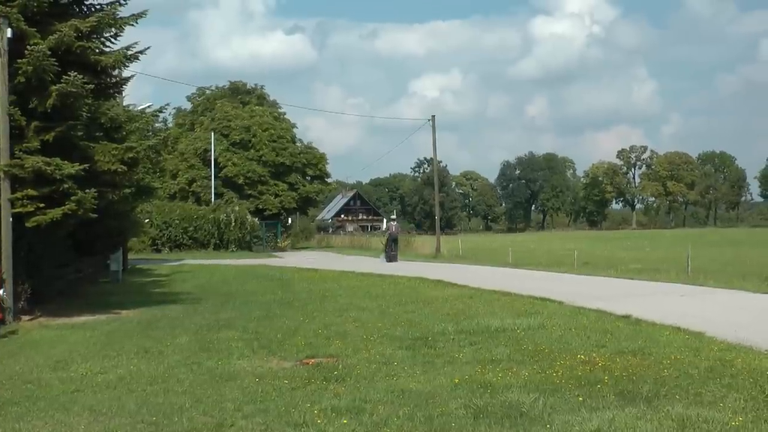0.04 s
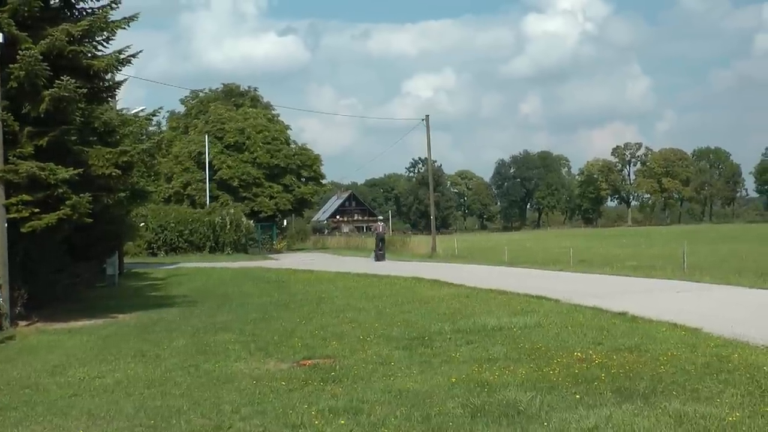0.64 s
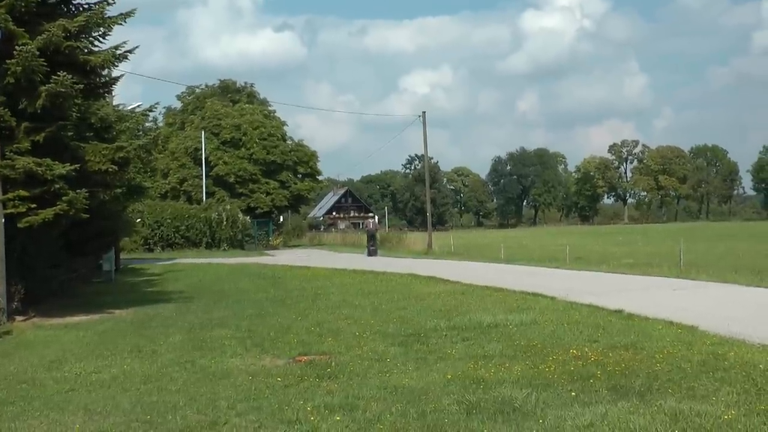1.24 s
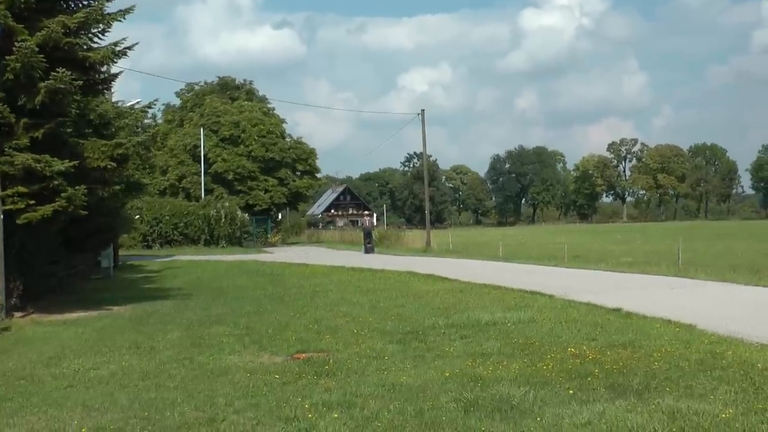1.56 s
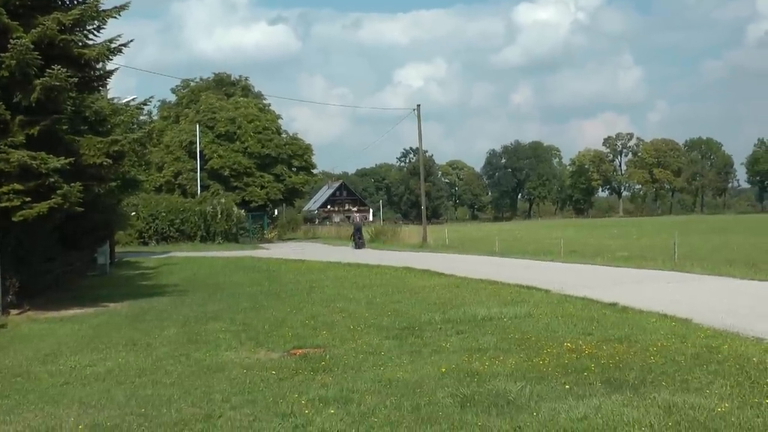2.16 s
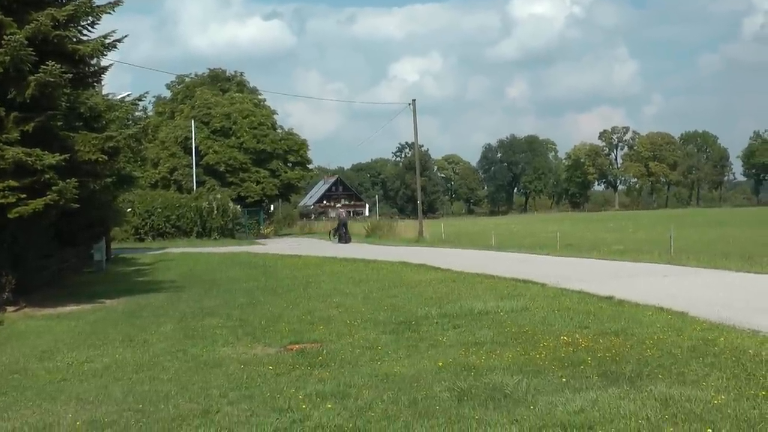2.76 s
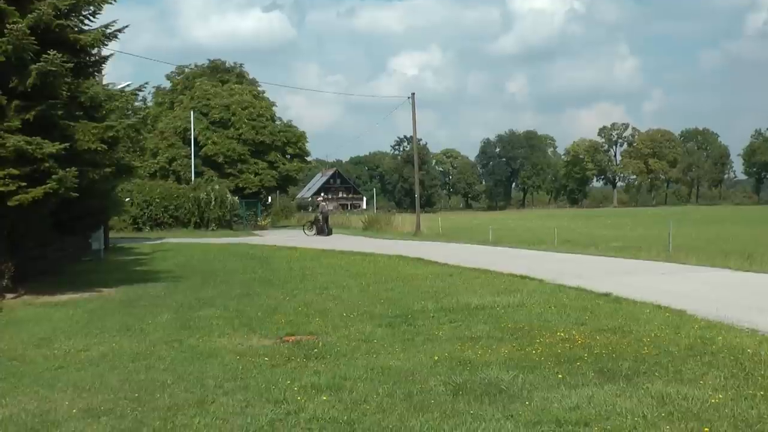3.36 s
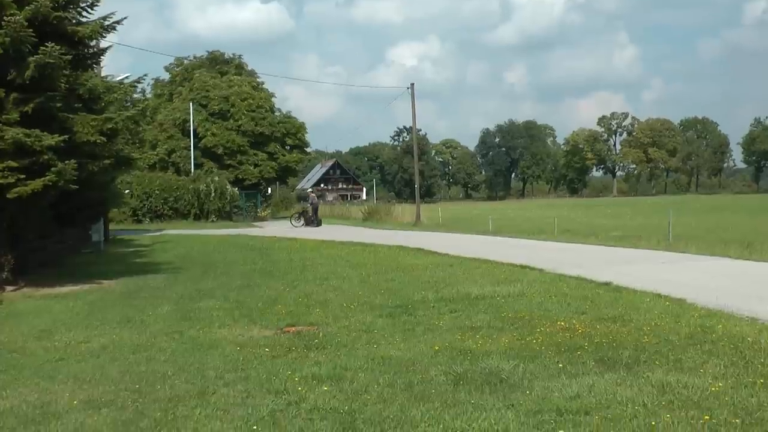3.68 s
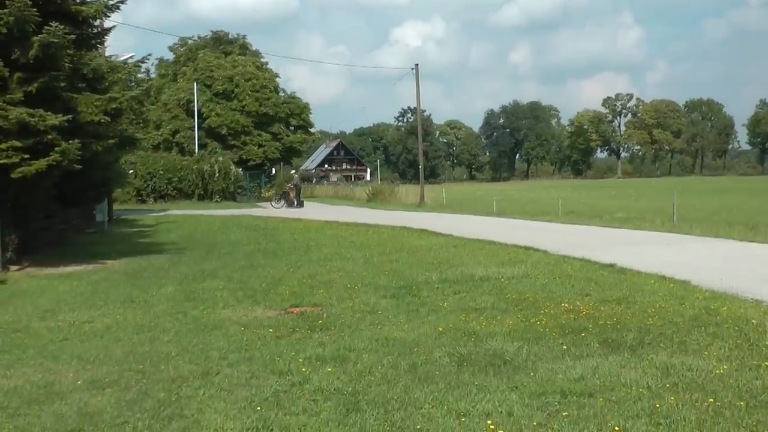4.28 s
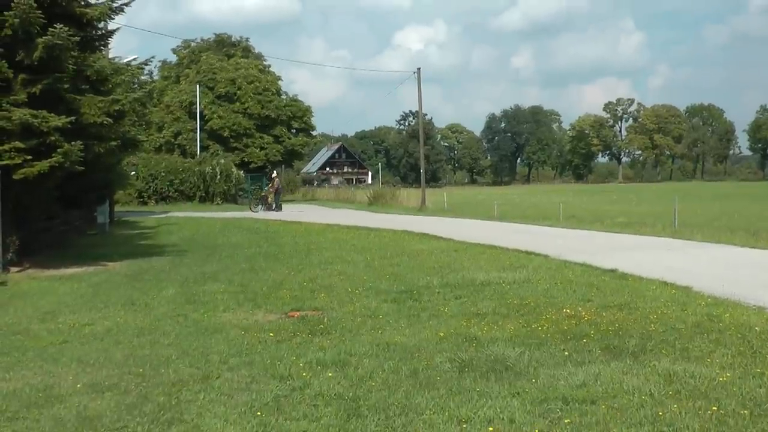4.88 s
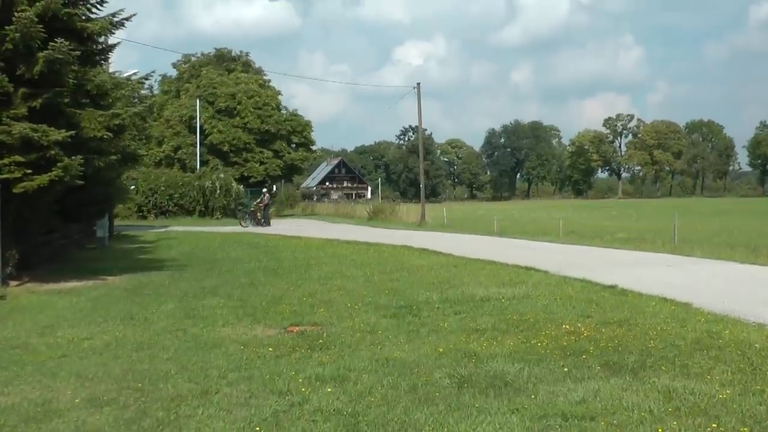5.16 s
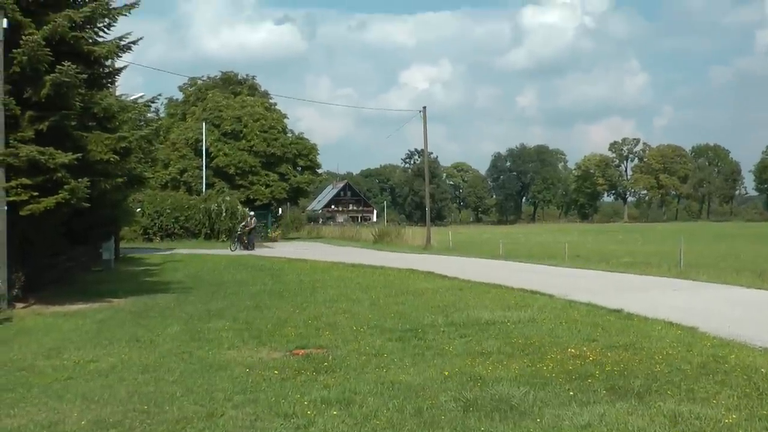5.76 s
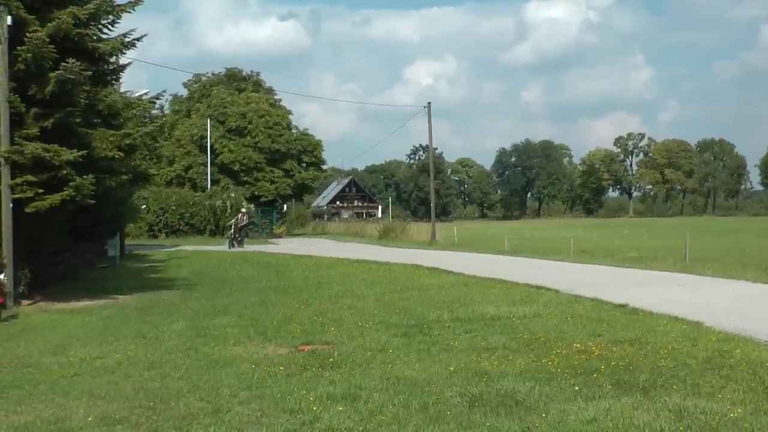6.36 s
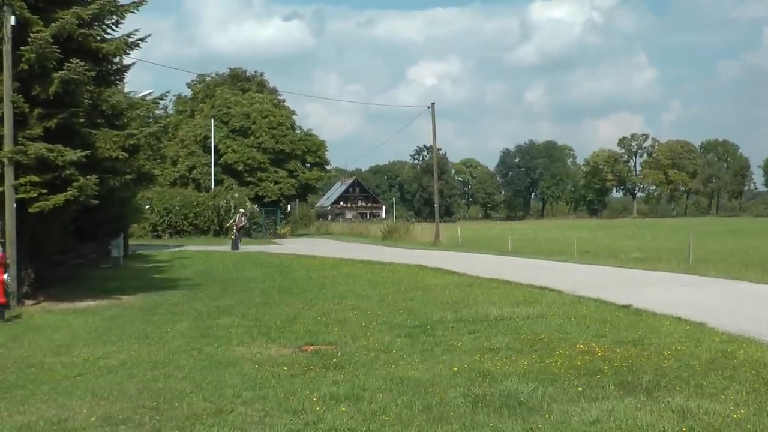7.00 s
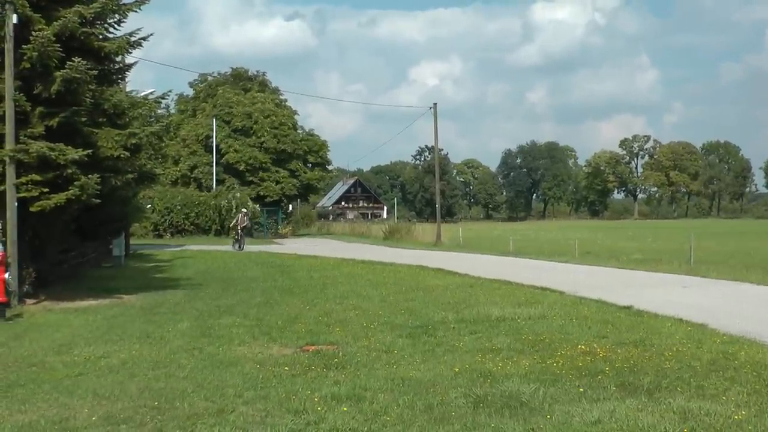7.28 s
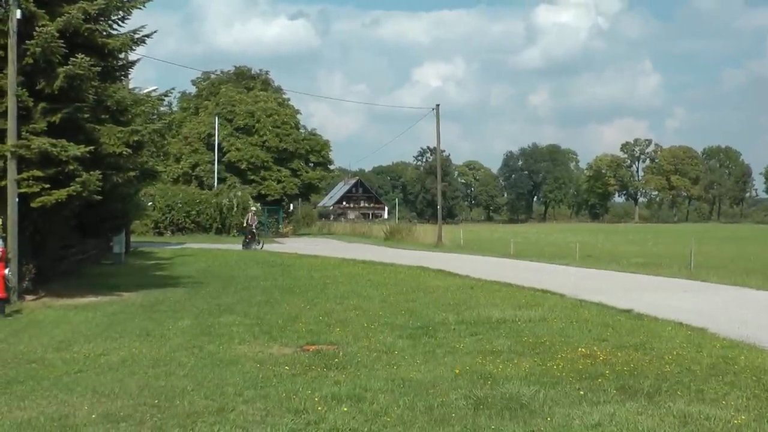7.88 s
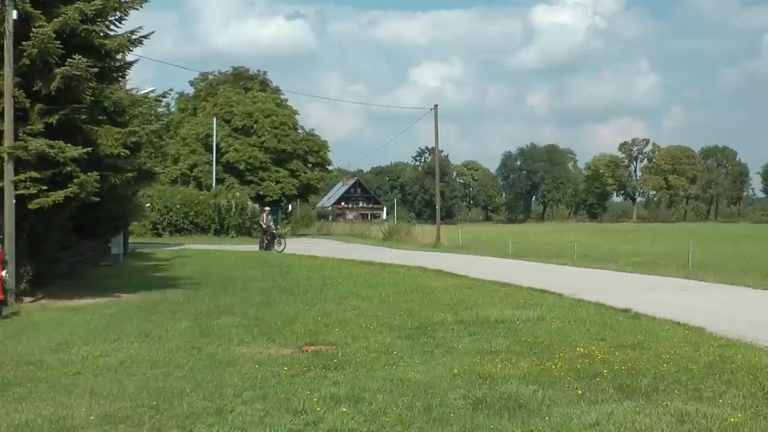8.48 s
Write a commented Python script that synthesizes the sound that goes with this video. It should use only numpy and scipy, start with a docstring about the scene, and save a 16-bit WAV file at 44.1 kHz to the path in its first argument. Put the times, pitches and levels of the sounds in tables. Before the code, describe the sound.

A small steam cycle chuffs rapidly along a country lane, growing louder over a soft breeze, with two distant bangs and faint birds.

```python
"""A small steam cycle chuffs along a country lane from the start, over breeze, far traffic and a low hum.
Two cylinders blow in turn, 17-27 blasts/s, louder on the facing side; steam leaks, trees scatter blasts.
A far bird cries at 0.6 s. Two distant bangs echo at 1.3 and 2.0 s; small birds chirp from 1.9 s.
Soft knocks follow from 2.7 s and a low drone swells near 3.7 s. The machine, turning towards the
listener, is slowest at 4.2 s, then picks up and is loudest near 7.7 s."""
import sys
import numpy as np
from scipy import signal
from scipy.fft import rfft, irfft
from scipy.io import wavfile
from scipy.ndimage import uniform_filter1d

SR = 44100
rng = np.random.default_rng(int(sys.argv[2]) if len(sys.argv) > 2 else 0)


def wrap_up_sound(samples):
    """Save the sound to the file named by the first command line argument, as 16-bit audio."""
    columns = np.atleast_2d(samples).T
    # keep every value between -1 and 1, then stretch to whole-number steps
    tamed = np.clip(columns, -1, 1)
    steps = np.round(tamed * 32767).astype(np.int16)
    wavfile.write(sys.argv[1], SR, steps)


N = 381024
TIME = np.arange(N) / SR

# crank, slowing into the bend and picking up after it: t/s, speed/(turns/s)
CRANK_SPEED = [(0.0, 6.8137), (0.891, 5.8162), (1.627, 5.1292), (2.358, 4.8702), (2.727, 4.6154),
               (3.14, 4.6491), (3.955, 4.2965), (4.172, 4.1688), (4.761, 4.2913), (5.277, 4.5227),
               (6.044, 4.5504), (6.411, 4.7401), (7.39, 5.0059), (7.565, 5.0194), (7.916, 5.4225),
               (8.64, 5.4655)]
# valve openings of two double-acting cylinders: crank angle/turns
VALVE_ANGLES = [.1335, .3987, .6563, .9155]
# four strokes: level offset/dB, nominal blow-down/turns, tilt offset/(dB/oct)
PISTON_STROKES = [(-.5, .097, 1.5), (-.5, .089, -2.1), (.5, .098, 1.5), (.5, 0.085, -0.8)]
# steam pressure and nearness together: t/s, relative level/dB
BLAST_LEVEL = [(0.0, -37), (1.51, -41), (2.36, -31.5), (2.69, -30.5), (2.89, -27), (3.34, -28), (3.53, -23),
               (4.26, -28), (4.85, -29), (5.17, -24.5), (5.75, -24.5), (6.03, -22), (6.87, -22),
               (7.66, -18), (7.85, -20), (8.11, -19.5), (8.31, -22), (8.64, -23)]
# machine swinging round: t/s, gain of first pipe and loss of second/dB
PIPE_FACING = [(0.0, 4.5), (1.3, 1), (2.5, 4), (3.1, 0.4), (4.2, -1.2), (4.7, 0.4), (5.7, 0), (6.6, -1.6),
               (7.4, -2.5), (7.9, -5.2), (8.6, -4)]
# treble coming and going across the field: t/s, tilt/(dB/oct)
BLAST_TILT = [(0.0, -2.2), (2.02, -5), (2.36, -1.8), (2.55, -4.5), (2.95, 2.2), (3.14, -4), (3.34, -3),
              (3.53, 2.5), (4.26, -5.5), (5.5, 2.1), (5.69, -2.65), (5.97, 0.5), (7.13, -0.6), (7.6, 1.0),
              (8.31, 0.2), (8.64, 3)]
# treble shelf, rising from 9 to 14 kHz: t/s, gain/dB
TOP_SHELF = [(0, -1), (3.6, 1.5), (4.3, -1), (5.4, 2), (6, -6), (6.6, 2), (7.1, 2.5), (7.6, -5), (8.64, 5)]
# steam jet: f/Hz, relative level/dB
JET_SPECTRUM = [(150, -39), (700, -34), (1300, -13), (2000, -5.5), (3200, -1), (5000, -4.5), (7000, -3),
                (8800, -4.5), (10000, -10), (12000, -14.5), (14000, -20), (16000, -25)]
# exhaust pipe resonances: f/Hz, width/Hz, nominal lift/dB
PIPE_MODES = [(2320, 350, 0), (3640, 340, 2.5), (4994, 880, 6.5), (6550, 1340, 3), (8750, 560, 1.5),
              (10790, 600, 3), (12900, 700, 2)]
# strength of the pipe's ring: t/s, factor on lift
PIPE_RING = [(0, 1), (2, 0.84), (3.5, 1.37), (4.2, 2.12), (4.7, .5), (6, 1.1), (7.7, 1.27), (8.3, 0.4)]
# faint, close reflection whose changing delay colours the blasts: t/s, delay/s
SHIFTING_REFLECTION = [(0, 0.0005), (2.5, 0.00048), (4.4, .00088), (6, 0.00061), (7, 0.000596),
                       (8.64, 0.00038)]
# steam leak: f/Hz, relative level/dB
LEAK_SPECTRUM = [(800, -8), (2000, -5.5), (3000, 1.5), (4100, -6.5), (5100, -4), (7000, -3.5), (8800, -5),
                 (10500, -12), (13000, -20), (16000, -18)]
# steam leak: t/s, level/dB
LEAK_LEVEL = [(0, -49), (1.5, -53.5), (3, -55), (4.2, -63.5), (6, -62), (6.6, -51.5), (7.7, -55.5),
              (8.2, -48.5), (8.64, -53)]
# breeze in the trees and far traffic: f/Hz, relative level/dB
AIR_SPECTRUM = [(15, -26), (70, -11), (120, -14.5), (220, -7), (350, -4), (600, -3), (1000, 2), (1400, -1),
                (2000, -6), (3000, -12.5), (6000, -18), (16000, -36)]
# hum partials: f/Hz, level/dB
HUM_TONES = [(25.5, -59), (50, -65)]
# far bird: t/s, level/dB, f/Hz, roughness (0-1)
BIRD_CRY = [(.58, -57, 1250, 1), (.65, -43.5, 1300, 1.1), (.71, -42, 1240, 1.1), (.78, -46, 1217, 0.5),
            (.85, -49, 1185, 0), (.92, -60, 1187, 0.4)]
# distant bangs: t/s, level/dB, boom start f/Hz, boom end f/Hz
FAR_BANGS = [(1.343, -26, 640, 510), (1.972, -26.5, 930, 351)]
# bang noise: f/Hz, relative level/dB
BANG_SPECTRUM = [(100, -26), (250, -10), (380, 0), (600, 4), (1000, -2), (1600, -3.5), (2200, -17),
                 (4000, -42), (9000, -70)]
# echoes from houses and wood edge: delay/s, gain/dB
BANG_ECHOES = [(.012, -5.5), (.034, -8.5), (.06, -11.5), (0.092, -10), (.115, -23), (.21, -13),
               (.255, -14.5)]
# small birds: t/s, length/s, start f/Hz, end f/Hz, relative level/dB
BIRD_CHIRPS = [(1.882, 0.033, 3980, 2720, -44), (2.052, .025, 4370, 2970, -44),
               (5.165, .03, 6100, 6700, -46), (5.72, 0.092, 7350, 7600, -48.5),
               (5.918, 0.03, 2920, 2440, -39), (6.455, 0.044, 7700, 7800, -48),
               (6.638, .022, 2850, 2500, -44), (7.17, 0.068, 7720, 7730, -47),
               (7.355, .024, 2960, 2430, -40), (7.96, 0.062, 7900, 7800, -42),
               (8.168, .028, 3050, 2780, -41)]
# soft knocks: centre t/s, level/dB
KNOCKS = [(2.665, -50), (2.86, -53), (3.065, -54), (3.219, -51)]
# far drone: peak t/s, half-width/s, level/dB
DRONE_SWELLS = [(3.7, 0.17, -60), (4.8, 0.34, -55.5), (6.35, 0.29, -60.5), (8.6, 0.17, -57)]


def gain_of(db):
    """dB to amplitude."""
    return 10 ** (np.asarray(db) / 20)


def unit_rms(x):
    """Scale to rms 1."""
    return x / np.sqrt(np.mean(x ** 2) + 1e-20)


def spectrum_db(points, hz):
    """Interpolate a spectrum over log frequency."""
    f, db = np.transpose(points)
    return np.interp(np.log(hz + 1), np.log(f + 1), db)


def follow(rows, t):
    """Columns of a curve at times t."""
    times, *columns = np.transpose(rows)
    return [np.interp(t, times, c) for c in columns]


def add(mix, at_s, sound):
    """Mix a sound in."""
    part = mix[max(round(at_s * SR), 0):][:len(sound)]
    part += sound[:len(part)]


def noise(n, shape):
    """Noise with spectrum shape(Hz) in dB; rms 1."""
    gain = gain_of(shape(np.fft.rfftfreq(n, 1 / SR)))
    return unit_rms(irfft(rfft(rng.standard_normal(n)) * gain, n))


def band_noise(hz, width_hz):
    """Noise through a resonance that may glide: shift to 0 Hz, smooth twice, shift back."""
    carrier = np.exp(2j * np.pi * np.cumsum(hz * np.ones(N)) / SR)
    pole = np.exp(-np.pi * width_hz / SR)
    baseband = signal.lfilter([1], [1, -2 * pole, pole * pole], rng.standard_normal(N) / carrier)
    return unit_rms((carrier * baseband).real)


def wash(shape, patchy_db):
    """Steady noise whose spectrum drifts in small patches."""
    hz = np.fft.rfftfreq(2048, 1 / SR)
    real, imag, patches = rng.standard_normal((3, N // 512 + 5, len(hz)))
    patches = unit_rms(uniform_filter1d(uniform_filter1d(patches, size=9, axis=0), size=18, axis=1))
    frames = (real + 1j * imag) * gain_of(shape(hz) + patchy_db * patches)
    return unit_rms(signal.istft(frames.T, nperseg=2048, noverlap=1536)[1][:N])


def glide(hz):
    """Sine following a pitch curve."""
    return np.sin(2 * np.pi * np.cumsum(hz) / SR)


def pulse(t, rise_s, decay_s):
    """Exponential rise and decay."""
    return (1 - np.exp(-t / rise_s)) * np.exp(-t / decay_s)


def scatter(x, t60_s, rise_s):
    """Tail of weak reflections from trees and hedges."""
    t = TIME[:SR]
    tail = rng.standard_normal(SR) * gain_of(-60 * t / t60_s) * (1 - np.exp(-t / rise_s))
    return signal.fftconvolve(x, tail / np.linalg.norm(tail))[:N]


def pipe_db(hz):
    """Lift of the pipe's resonances."""
    return sum(db / (1 + (2 * (hz - f) / width_hz) ** 2) for f, width_hz, db in PIPE_MODES)


def chuff(at_s, level_db, length_s, tilt_db_oct, top_db, opening_s):
    """A valve opens; the cylinder blows down through the pipe as a turbulent jet."""
    t = TIME[:3072]
    ring, = follow(PIPE_RING, at_s)
    delay_s, = follow(SHIFTING_REFLECTION, at_s)
    ripple_db = 2.5 * unit_rms(uniform_filter1d(rng.standard_normal(len(t) // 2 + 1), size=25))

    def shape(hz):
        """Jet, pipe and a faint, close reflection, in dB."""
        source_db = spectrum_db(JET_SPECTRUM, hz) + ring * pipe_db(hz)
        tilt_db = tilt_db_oct * np.log2(np.clip(hz, 2000, 12000) / 5000)
        shelf_db = top_db * np.interp(hz, [9000, 14000], [0, 1])
        reflection_db = 20 * np.log10(abs(1 - 0.076 * np.exp(2j * np.pi * hz * delay_s)))
        return source_db + tilt_db + shelf_db + reflection_db + ripple_db

    jet = noise(len(t), shape)
    body = signal.filtfilt(*signal.butter(2, 7000, fs=SR), jet)
    flow = np.sin(np.pi / 2 * np.minimum(t / opening_s, 1)) * np.exp(-(t / length_s) ** 1.785)
    treble = 1.153 * (jet - body) * flow ** 0.19  # needs the fastest flow, so fades first
    return gain_of(level_db) * flow * (body + treble)


def exhaust(nominal_db=-25, opening_turns=0.031, lead_s_per_db=0.000136):
    """Four blasts a turn from alternate pipes; the facing pipe is louder, brighter and heard sooner."""
    crank_turns = np.cumsum(follow(CRANK_SPEED, TIME)[0]) / SR
    out = np.zeros(N)
    for k, (stroke_db, blow_turns, stroke_tilt) in enumerate(PISTON_STROKES):
        for at_s in np.interp(np.arange(VALVE_ANGLES[k], crank_turns[-1], 1), crank_turns, TIME):
            crank_hz, = follow(CRANK_SPEED, at_s)
            facing_db = (-1) ** k * follow(PIPE_FACING, at_s)[0]
            level_db = follow(BLAST_LEVEL, at_s)[0] + stroke_db + facing_db + rng.normal(0, 0.4)
            tilt_db_oct = follow(BLAST_TILT, at_s)[0] + stroke_tilt + rng.normal(0, 0.45)
            tilt_db_oct += 0.23 * facing_db
            top_db = follow(TOP_SHELF, at_s)[0] + 0.6 * facing_db  # top hiss beams straight ahead
            # a harder blast empties the cylinder sooner
            length_s = blow_turns / crank_hz * gain_of(0.0645 * (nominal_db - level_db))
            blast = chuff(at_s, level_db, length_s, tilt_db_oct, top_db, opening_turns / crank_hz)
            add(out, at_s - lead_s_per_db * facing_db, blast)
    return out


def steam_leak():
    """Continuous hiss of escaping steam, coloured by the pipe."""
    hiss = wash(lambda hz: spectrum_db(LEAK_SPECTRUM, hz) + 0.9 * pipe_db(hz), patchy_db=3.5)
    return gain_of(follow(LEAK_LEVEL, TIME)[0]) * hiss


def engine():
    """Blasts, their scatter from the trees, and the leak."""
    blasts = exhaust()
    trees = signal.lfilter(*signal.butter(1, 6000, fs=SR), scatter(blasts, t60_s=0.14, rise_s=0.0081))
    return gain_of(-3.5) * blasts + gain_of(-22.5) * trees + steam_leak()


def breeze_and_traffic():
    """Steady wash of wind in the trees and far traffic."""
    return gain_of(-45) * wash(lambda hz: spectrum_db(AIR_SPECTRUM, hz), patchy_db=0.62)


def hum():
    """Two faint, steady low tones."""
    return sum(gain_of(db) * unit_rms(np.sin(2 * np.pi * (hz * TIME + rng.random())))
               for hz, db in HUM_TONES)


def bird_cry():
    """Far bird: a harsh start clears into a thin falling note."""
    db, hz, roughness = follow(BIRD_CRY, TIME)
    roughness = np.clip(roughness, 0, 1)
    harsh = band_noise(hz, width_hz=760)
    waver = unit_rms(uniform_filter1d(rng.standard_normal(N), size=600))
    clear = unit_rms(glide(hz * (1 + 0.007 * waver)))
    sounding = (TIME > BIRD_CRY[0][0]) & (TIME < BIRD_CRY[-1][0])
    return sounding * gain_of(db) * (np.sqrt(roughness) * harsh + np.sqrt(1 - roughness) * clear)


def bangs():
    """Dull bursts with a falling boom; rough walls and trees throw them back smeared."""
    out, t, tail_t = np.zeros(N), TIME[:4096], TIME[:SR]
    burst_envelope = pulse(t, rise_s=0.0016, decay_s=0.013)

    def dull_noise(n):
        """Noise in the bang's colour."""
        return noise(n, lambda hz: spectrum_db(BANG_SPECTRUM, hz))

    for at_s, db, start_hz, end_hz in FAR_BANGS:
        boom_hz = end_hz + (start_hz - end_hz) * np.exp(-t / 0.009)
        boom = glide(boom_hz) * pulse(t, rise_s=0.0017, decay_s=0.017)
        add(out, at_s, gain_of(db) * (burst_envelope * dull_noise(len(t)) + 0.79 * boom))
        for delay_s, echo_db in BANG_ECHOES:
            add(out, at_s + delay_s, gain_of(db + echo_db) * burst_envelope * dull_noise(len(t)))
        roll_envelope = gain_of(db - 15.5 - 37 * tail_t) * (1 - np.exp(-tail_t / 0.033))
        add(out, at_s, roll_envelope * dull_noise(SR))
    return out


def chirps():
    """Short gliding whistles of small birds, blurred by the trees."""
    out = np.zeros(N)
    for at_s, length_s, start_hz, end_hz, db in BIRD_CHIRPS:
        hz = np.geomspace(start_hz, end_hz, round(length_s * SR))
        add(out, at_s, gain_of(db) * signal.windows.tukey(len(hz), 0.7) * glide(hz))
    return gain_of(-2) * out + gain_of(-9) * scatter(out, t60_s=0.25, rise_s=0.01)


def knocks(hz=150, length_s=0.03):
    """Soft knocks, each a few cycles of a low tone."""
    out, t = np.zeros(N), TIME[:round(length_s * SR)]
    knock = np.hanning(len(t)) * np.sin(2 * np.pi * hz * t)
    for at_s, db in KNOCKS:
        add(out, at_s - t[-1] / 2, gain_of(db) * knock)
    return out


def drone():
    """Far, low band of noise that swells and fades."""
    swell = sum(gain_of(db) * np.exp(-0.5 * ((TIME - peak_s) / width_s) ** 2)
                for peak_s, width_s, db in DRONE_SWELLS)
    return swell * band_noise(341, width_hz=102)


def scene():
    """Mono mix, heard from the lawn beside the lane."""
    return (engine() + bird_cry() + bangs() + chirps() + knocks() + drone()
            + breeze_and_traffic() + hum())[None]


def record(dry, cutoff_hz=16050):
    """Low-pass band limit."""
    lowpass = signal.firwin(401, cutoff_hz, window=("kaiser", 8), fs=SR)
    return signal.oaconvolve(dry, lowpass[None], "same")


dry = scene()
out = record(dry)
wrap_up_sound(out)
```